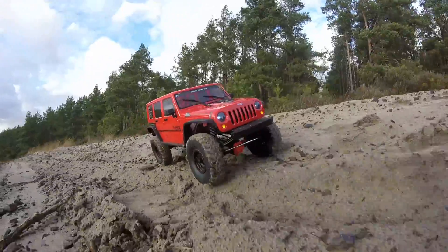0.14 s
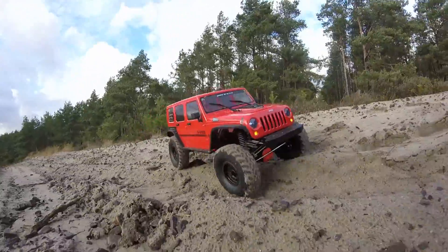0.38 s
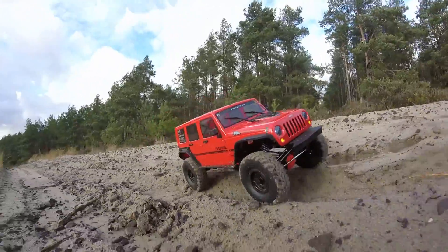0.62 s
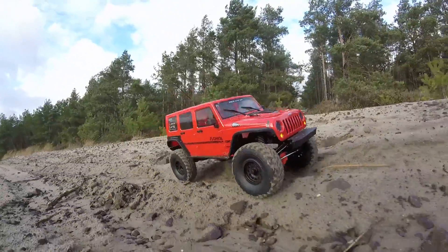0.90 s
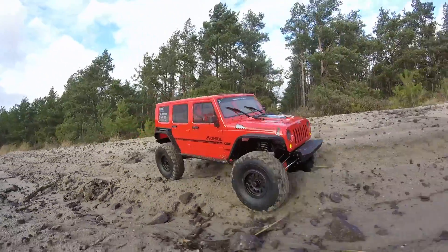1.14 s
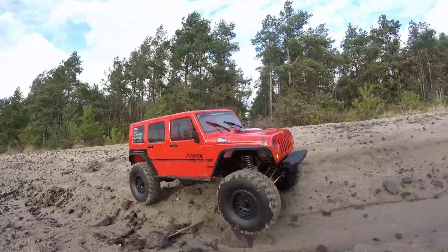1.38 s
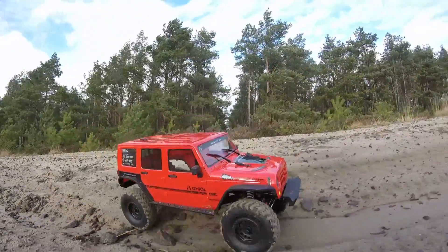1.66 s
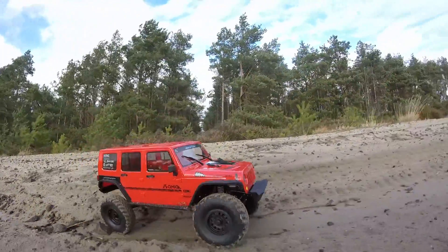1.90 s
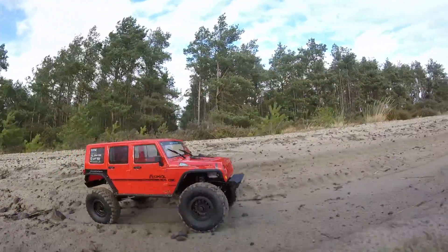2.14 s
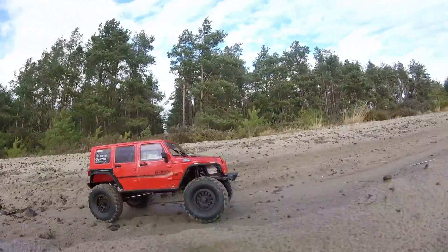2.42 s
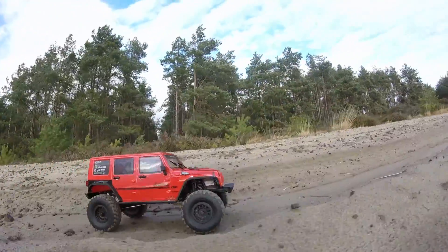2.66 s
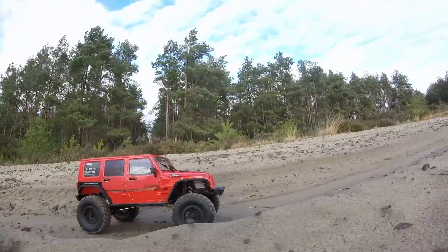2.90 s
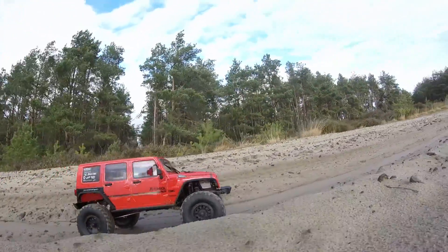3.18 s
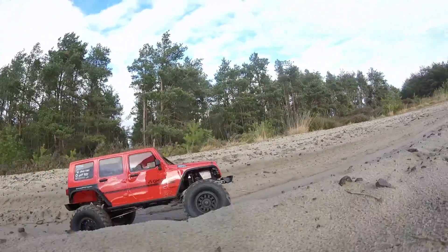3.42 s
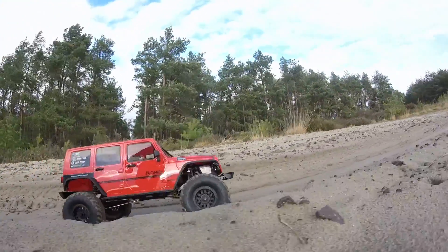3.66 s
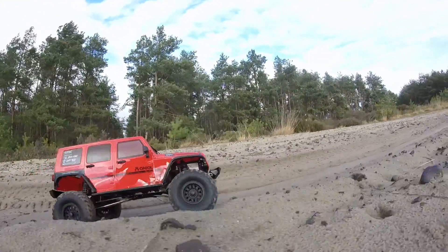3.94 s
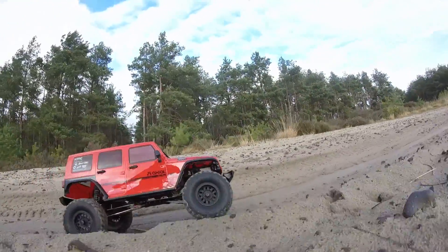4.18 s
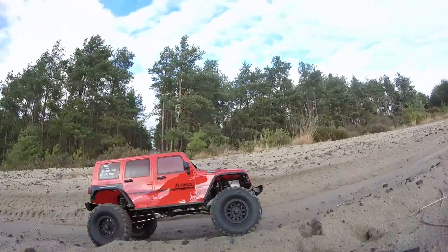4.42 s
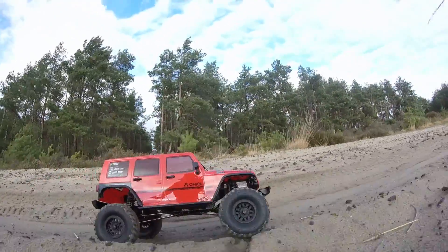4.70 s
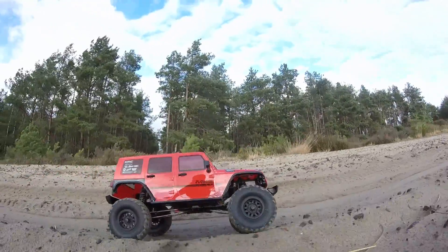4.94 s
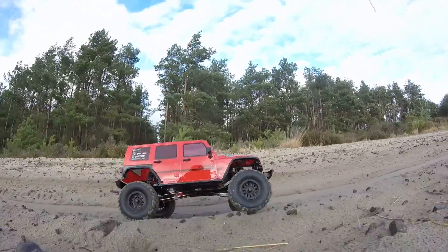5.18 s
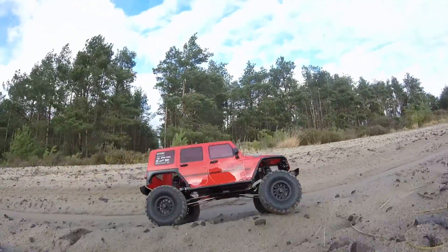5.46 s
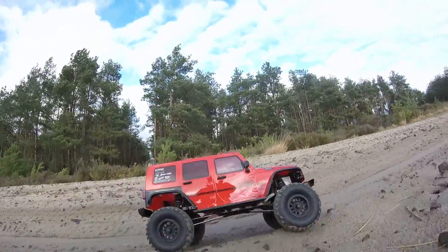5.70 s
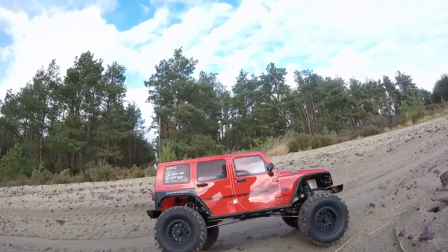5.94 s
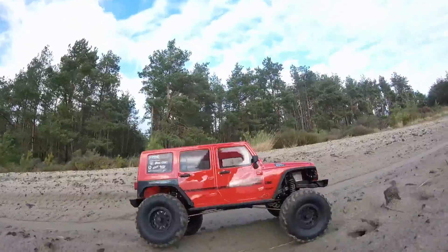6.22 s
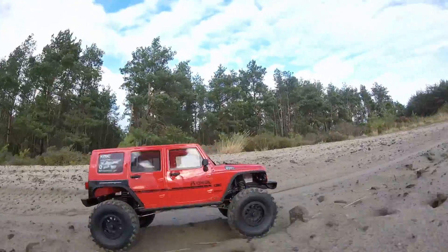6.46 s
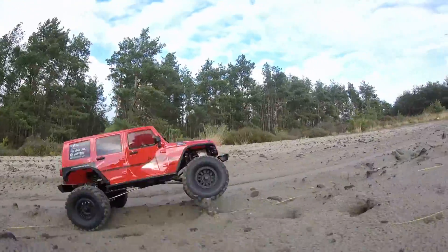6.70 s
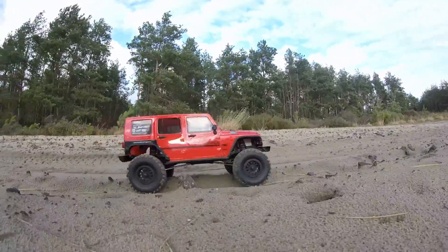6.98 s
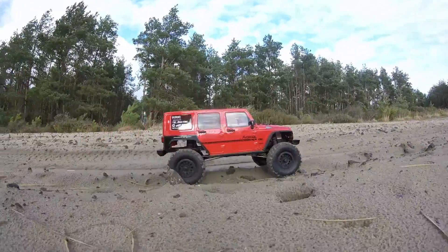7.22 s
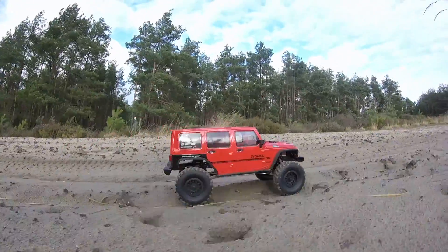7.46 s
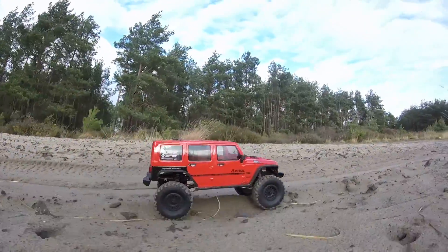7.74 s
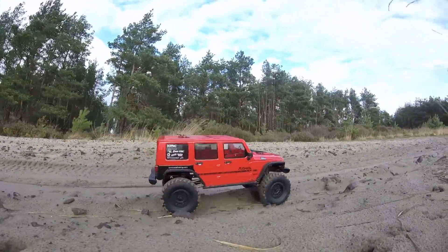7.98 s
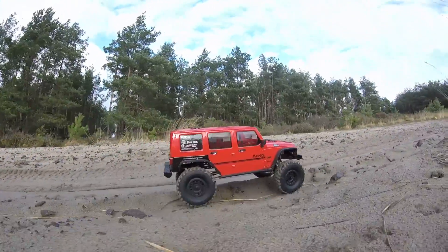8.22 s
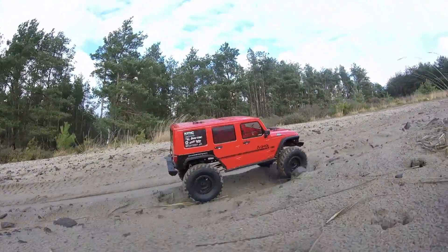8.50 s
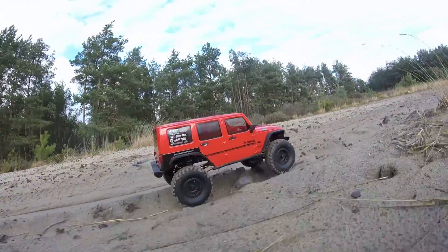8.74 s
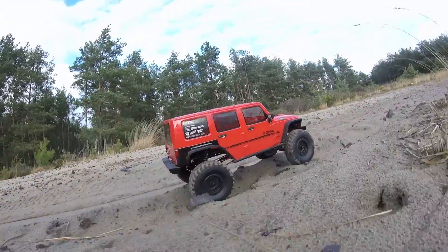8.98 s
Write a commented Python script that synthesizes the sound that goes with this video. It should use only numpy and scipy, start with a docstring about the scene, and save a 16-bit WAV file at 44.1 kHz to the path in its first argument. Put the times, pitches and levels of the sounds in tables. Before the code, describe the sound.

A quiet open-air bed with a tiny motor's thin, rough whirr, distant and unsteady. Light clicks of plastic come first, then a few dry grit ticks underfoot. Suddenly the camera's plastic case cracks and creaks hard right at the microphone, with a nasal groan and shaking rumble from the handle. After a short lull, scattered creaks return, and a final dense burst of snaps closes it.

```python
"""Open sandy ground: a small electric truck crawls along, followed by a hand-held camera in a plastic housing.
Gear teeth in mesh whine faintly and ring the truck's shell. Impulsive slips and stick-slip rubbing excite
the housing's resonances as snaps and creaks. The handle murmurs, then groans as a narrow-band tone, and
rumbles and thumps; grit ticks underfoot with short decaying knocks, and shaped noise makes a quiet
open-air hiss under all."""
import sys
import numpy as np
from scipy import signal
from scipy.fft import rfft, irfft, next_fast_len
from scipy.io import wavfile
from scipy.ndimage import uniform_filter1d, map_coordinates

SR = 44100
rng = np.random.default_rng(int(sys.argv[2]) if len(sys.argv) > 2 else 0)


def gain_from_decibels(decibels):
    """Convert decibel values to linear amplitude factors."""
    exponent = np.asarray(decibels, float) / 20
    return 10 ** exponent


def wav_out(sig):
    """Save sig, one row per channel (or a flat mono array), as 16-bit PCM at SR to the path in sys.argv[1]."""
    wavfile.write(sys.argv[1], SR, np.round(np.clip(np.atleast_2d(sig).T, -1, 1) * 32767).astype(np.int16))


N = 402191  # length in samples

# resonances of the plastic housing: (centre [Hz], width [Hz], relative level [dB])
HOUSING_MODES = [(988, 16, -24), (1072.5, 35, -6), (1266, 87, 1.5), (1477, 52, -0.5), (1746, 150, -1),
                 (2019, 90, -2.5), (2471, 83, 11.5), (3160, 72, 3), (3470, 52, 2.5), (3710, 253, -2),
                 (3941, 41, 0), (4088, 116, -7), (4590, 125, -11), (5350, 62, -28), (6320, 75, -21.5),
                 (6760, 134, -22.5), (7300, 610, -31), (8260, 51, -31.5), (9475, 37, -14),
                 (9650, 790, -23.5), (10520, 60, -25), (13000, 320, -42), (13930, 400, -48)]
# snaps of the housing: (time [s], peak level [dB], brightness of the high modes [dB])
SNAP_EVENTS = [(2.9419, -26, 3), (2.967, -25.5, -20), (3.018, -24, -28), (3.076, -37.5, -13),
               (3.101, -27, 2), (3.169, -39, -15), (3.199, -29.5, 4), (3.3632, -23, -22), (3.3722, -31, -2),
               (3.38, -34.5, 0), (3.436, -28, -22), (3.4585, -36, -10), (3.5716, -32.5, -8),
               (3.9044, -32, 3), (3.9144, -37, -7), (4.893, -24, 0), (4.908, -32, 5), (5.0327, -4.5, -3),
               (5.1028, -8, -1), (5.1752, -14.5, 2), (5.198, -6.5, 7), (5.249, -14, -1), (5.29, -14.5, 4),
               (5.303, -15, 4), (5.3271, -24, -10), (5.344, -33, -12), (5.3654, -21, -6), (5.3822, -28, 5),
               (5.4, -22, -8), (5.478, -20.5, -16), (5.583, -7.5, 1.5), (5.685, -14.5, 4),
               (5.698, -12.5, -5), (5.7128, -12, 6), (5.741, -34, -8), (5.8323, -22.5, 7),
               (5.877, -16.5, -16), (5.9469, -26, -10), (6.0021, -20, -15), (6.206, -18.5, 0),
               (6.2131, -15.5, -4), (6.2538, -25, -5), (6.2956, -28, -8), (6.3068, -22, -14),
               (6.3262, -25, 6), (6.3874, -27.5, 9), (6.513, -17, -15), (6.5386, -27.5, -8),
               (6.653, -25, 8), (6.771, -12.5, 8), (6.79, -16.5, 0), (6.8278, -26, -8), (7.4103, -32, 5),
               (7.502, -18.5, 1), (7.5606, -24.5, 0), (7.5805, -17.5, 0), (7.635, -13, 4.5),
               (7.6602, -21, 6), (7.7333, -12.5, 3), (7.7545, -16, 7), (7.7714, -16, 3), (7.8388, -23, 6),
               (7.858, -24.5, 7), (7.9232, -17.5, 4), (7.9543, -24.5, -15), (8.016, -20, 5),
               (8.115, -26.5, -8), (8.1847, -29.5, 4), (8.2856, -25.5, 1), (8.304, -21, 2),
               (8.3609, -30, 2), (8.3903, -28, -1), (8.4846, -35, 8), (8.582, -30.5, -2),
               (8.6806, -21.5, -1.5), (8.7078, -21, -20), (8.733, -24, -3), (8.742, -7.5, -1),
               (8.8026, -11.5, 6), (8.8102, -18, 9), (8.863, -7, 2), (8.874, -8, -10), (8.8971, -15, -2),
               (8.906, -12, 8), (8.936, -20, -5), (8.9615, -20, -6), (9.0074, -17, -10),
               (9.0306, -16.5, -16.5), (9.068, -17, 2), (9.097, -20, 5), (9.1075, -17, -2)]
# how freely the grip lets the housing sound: (time [s], main ring [dB], high modes under rubbing [dB])
GRIP_FREEDOM = [(3.5, -1, -7), (5, 1.5, -1.5), (5.8, 1, 1), (6.1, -2.5, 3.5), (7.2, -1.5, -1.5), (9, -2, 1)]
# strokes of the hand along the grip: (time of full level [s], time held [s], driving level [dB])
GRIP_STROKES = [(3.321, 0.032, -54), (3.451, 0.07, -52), (3.6, 0.16, -49), (5.131, 0.012, -36),
                (5.209, 0.18, -34), (5.442, 0.31, -37), (5.709, 0.03, -31.5), (5.78, 0.21, -34.5),
                (6.032, 0.17, -34.5), (6.215, 0.011, -30), (6.268, 0.029, -27), (6.333, 0.2, -32.5),
                (6.647, 0.033, -35), (6.76, 0.11, -41), (6.9, 0.48, -49), (7.391, 0.032, -39),
                (7.568, 0.15, -41), (7.77, 0.15, -40), (7.938, 0.077, -36.5), (8.05, 0.29, -40.5),
                (8.379, 0.11, -39.5), (8.5, 0.047, -46), (8.711, 0.14, -44.5), (8.856, 0.025, -29.5),
                (8.921, 0.21, -32.5)]
# a tightening squeeze that pulls the high modes flat: (time [s], squeeze [0-1])
GRIP_SQUEEZE = [(8.3, 0), (8.42, .9), (8.66, 1), (8.7, 0)]
# low narrow-band sound of the handle, a faint unsteady murmur until 4.2 s, then a groan:
# (time [s], pitch [Hz], level [dB])
HANDLE_TRACK = [(0, 64, -72), (.66, 68.4, -54), (1.3, 69.5, -55), (2.4, 65.8, -67), (3.6, 75.5, -68),
                (4.1, 75.3, -63), (4.29, 105, -49.5), (4.62, 93.6, -47.5), (4.85, 114.4, -40),
                (4.98, 145, -36.5), (5.1, 143.8, -43), (5.24, 99.7, -43.5), (5.33, 140.7, -35),
                (5.4, 139, -39.5), (5.5, 120.7, -32.5), (5.66, 141, -36), (5.88, 124.3, -56),
                (5.95, 125.4, -28), (6.03, 118.3, -40.5), (6.14, 122, -32.5), (6.2, 129.4, -24),
                (6.39, 173.3, -21.5), (6.53, 135.8, -29), (6.76, 140, -28.5), (6.83, 104.2, -33),
                (6.9, 100.4, -48), (7.07, 85.5, -47), (7.19, 98.1, -41.5), (7.28, 129.8, -42.5),
                (7.35, 134.6, -40), (7.5, 98, -44.5), (7.9, 105.3, -46), (8.2, 119, -55.5),
                (8.6, 110.2, -46.5), (9.12, 141, -71)]
# shaking carried by hand and handle, stronger once the walker hurries: (time [s], rumble level [dB])
HAND_SHAKING = [(0, -47.5), (2.6, -48.5), (3.2, -54.5), (4.3, -46.5), (5.3, -39.5), (6.7, -40.5),
                (7.7, -48.5), (8.2, -41.5), (9.12, -45)]
# spectrum of the rumble: (frequency [Hz], relative density [dB])
RUMBLE_SPECTRUM = [(12, -25), (22, -6.5), (33, -1.5), (43, 4.5), (54, -6), (70, -6.5), (110, -60.5)]
# spectrum of the handle's shudder: (frequency [Hz], relative density [dB])
SHUDDER_SPECTRUM = [(100, -4), (170, -5.5), (210, -9.5), (361, -1.5), (380, -7), (449, -18), (566, -23),
                    (622, -19), (700, -29), (910, -111)]
# dull thumps in the handle: (time [s], level before onset and decay [dB], pitch [Hz])
HANDLE_THUMPS = [(3.37, -37, 359), (3.873, -34.5, 295), (5.032, -26.5, 350), (5.107, -27.5, 324),
                 (5.582, -26.5, 318), (6.263, -19, 328), (8.301, -24.5, 352.3), (8.421, -27.5, 310),
                 (8.501, -30.5, 320), (8.741, -28, 330)]
# grit underfoot: (time [s], tick level before halving [dB], starting level of the knock [dB])
GRIT_EVENTS = [(4.241, -35, -38), (4.2772, -28, -31), (4.2811, -26.5, -31), (4.33, -40, -37),
               (4.436, -39, -37.5), (4.4612, -38.5, -42), (4.7269, -29.5, -30), (5.002, -21, -24),
               (6.5807, -25.5, -43)]
# spectrum of a grit tick: (frequency [Hz], relative density [dB])
GRIT_SPECTRUM = [(900, -42), (2000, 5), (4000, 3.5), (7000, 2), (10000, -3), (13000, -18), (15500, -26)]
# the truck's drive: (time [s], gear-mesh frequency [Hz], load as level of the whine [dB])
DRIVE_TRACK = [(0, 954, -92), (.35, 1024, -89), (.52, 965, -66), (.63, 1025, -68), (.79, 1050, -50.5),
               (.87, 1075, -65), (.94, 1063, -55), (1.02, 1094, -59), (1.3, 1160, -71), (1.45, 1035, -58.5),
               (1.58, 1106, -57), (1.72, 1086, -50), (1.79, 1080, -59.5), (1.97, 1068, -60.5),
               (2.05, 1073, -72), (2.11, 1102, -54), (2.18, 1105, -79), (2.3, 1096, -67), (2.42, 1099, -71),
               (2.57, 1077, -57.5), (2.75, 1094, -66), (3.1, 1083, -60), (3.72, 1030, -59),
               (3.85, 1075, -67), (4.15, 1034, -61), (4.45, 1070, -61), (4.66, 1049, -57),
               (4.85, 1082, -64), (7, 1042, -60)]
# mesh tone an octave under the whine, clearest while the gearbox side faces the camera: (time [s], level [dB])
MESH_LEVEL = [(.25, -77), (.45, -63), (.8, -62), (.93, -84), (1.05, -73), (1.4, -63), (1.8, -66.5),
              (3, -71), (4.2, -71), (4.6, -64.5), (7, -66.5)]
# resonances of the truck's shell: (centre [Hz], width [Hz], relative level [dB])
SHELL_MODES = [(2526, 110, 8), (3160, 230, 2), (3445, 140, 5.5), (4120, 240, 5), (4860, 170, -1),
               (5000, 74, -11)]
# short smeared tones of the truck at fixed pitches: (middle [s], length [s], pitch [Hz], level [dB])
TONE_FLARES = [(.5, 0.07, 3470, -62), (1.031, .06, 4260, -61), (1.28, 0.28, 3480, -62.5),
               (1.453, 0.13, 3120, -57.5), (1.449, .14, 4240, -62), (1.853, 0.16, 4150, -61),
               (4.101, .3, 4176, -65), (4.72, .35, 5200, -67), (1.08, .35, 2560, -65)]
# spectrum of the open air: (frequency [Hz], relative density [dB])
AIR_SPECTRUM = [(41, -52), (70, -5.5), (108, -2.5), (548, -14), (1820, -19), (2180, -16.5), (2850, -47),
                (3830, -39), (4190, -60), (5500, -28), (9250, -36), (14500, -59), (15600, -55)]

# groups of housing modes
CENTRES = np.transpose(HOUSING_MODES)[0]
LOW, HIGH = CENTRES < 1900, CENTRES > 5000
MAIN = np.abs(CENTRES - 2450) < 150
UPPER = (CENTRES > 2900) & ~HIGH

LOW_RING_DB, UPPER_RING_DB = -6, -3  # a snap drives these modes less than rubbing does
HIGH_SAG, MAIN_SAG = .065, .035  # fractional drop in pitch of a fully damped mode
GRIP_S, LET_GO_DB_PER_S = 0.081, 242  # swell before a stroke's full level, fall after its hold
RESTING_DB = -70.5  # the hand resting on the grip
BRIGHT_DB, BRIGHT_PER_DB = 3.5, -0.33  # extra brightness at -32 dB, its change per dB of rubbing
SLIDE_DB, SLIDES_PER_S = 2, 10  # the fingers wander, so each mode is driven now harder, now softer
LOOSE_DB, LOOSE_PER_S, WANDER = 1.5, 12, .07  # when faint, the handle's tone is lumpy and wanders in pitch
GROAN_SMEAR_HZ = 70
LUMPS_DB, LUMPS_PER_S = 3.5, 4.023  # unevenness of the rumble
KNOCK_HZ, KNOCK_S, TICK_S = 2170, 0.0024, 0.0011  # the knock's ring, decay times of knock and tick
MESH_CLEAN, WHINE_CLEAN = .5, .55  # clean share of each gear tone
THROB = .7  # depth of the whine's throbbing
AIR_DB = -55.5


def unit(x):
    """Normalisation: the signal scaled to rms 1."""
    return x / np.sqrt(np.mean(x ** 2) + 1e-20)


def curves(rows):
    """Linear interpolation: one value per sample for each column after the time."""
    s, *cols = np.transpose(rows)
    return [np.interp(np.arange(N) / SR, s, c) for c in cols]


def wobble(rate):
    """Band-limited fluctuation: a smooth random curve with rate knots a second."""
    knots = rng.standard_normal(int(N * rate / SR) + 4)
    return map_coordinates(knots, [np.arange(N) * rate / SR])


def narrow(turn, hz, clean):
    """Narrow-band modulation: a clean share of a tone, the rest smeared over about hz; rms near 1."""
    smear = wobble(hz) * np.sin(turn) + wobble(hz) * np.cos(turn)
    return np.sqrt(2 * clean) * np.sin(turn) + np.sqrt(1 - clean) * smear


def filtered(x, response):
    """Linear filtering: the spectrum times a response of frequency."""
    m = next_fast_len(N + 8192)
    return irfft(rfft(x, m) * response(np.fft.rfftfreq(m, 1 / SR)), m)[:N]


def coloured(x, spectrum):
    """Spectral shaping: interpolation in dB over log frequency, scaled to rms 1."""
    f, db = np.transpose(spectrum)
    return unit(filtered(x, lambda hz: gain_from_decibels(np.interp(np.log(hz + 1), np.log(f + 1), db))))


def modes(hz, table=HOUSING_MODES):
    """Modal resonance: one response per row; neighbours move in opposite sense; the top is damped."""
    centre, width, db = np.transpose(table)[:, :, None]
    sign = (-1.) ** np.arange(len(centre))[:, None]
    resonance = 1j * hz * width / (centre * centre - hz * hz + 1j * hz * width)
    u = hz / 11200
    return sign * gain_from_decibels(db) * resonance / (1 - u * u + 1.2j * u) ** 3


def damped(fingers, squeeze=0):
    """Loading of a resonator: the main ring and the top modes of the housing pulled flat."""
    sag = fingers * MAIN_SAG * MAIN + squeeze * HIGH_SAG * (CENTRES > 7500)
    return HOUSING_MODES * np.c_[1 - sag, np.ones((len(sag), 2))]


def snaps():
    """Impulsive excitation: each short ragged slip rings the housing's modes at new strengths."""
    size = 4096
    s, db, high_db = np.transpose(SNAP_EVENTS)[:, :, None]
    t = np.arange(size) / SR
    slip = rng.standard_normal((len(s), size))
    slip *= np.exp(-(t / 0.0016) ** 2) + 0.18 * np.exp(-t / 0.01)
    slip *= 1 - np.exp(-(t + 1 / SR) / 0.00027)  # the release takes a moment
    main_db = np.interp(s, *np.transpose(GRIP_FREEDOM)[:2])
    strength_db = LOW * LOW_RING_DB + UPPER * UPPER_RING_DB + MAIN * main_db + HIGH * high_db
    # every mode but the main ring varies from snap to snap
    strength_db = strength_db + 2 * ~MAIN * rng.standard_normal((len(s), len(HOUSING_MODES)))
    response = modes(np.fft.rfftfreq(size, 1 / SR), damped(0.4))  # the grip is half closed
    ring = irfft(rfft(slip) * (gain_from_decibels(strength_db) @ response), size)
    ring *= gain_from_decibels(db) / np.abs(ring).max(1, keepdims=True)
    at = np.round(s * SR).astype(int) + np.arange(size)
    return np.bincount(at.ravel(), ring.ravel(), N + size)[:N]


def strokes():
    """Friction envelope in dB: every stroke swells in, holds and dies away; strokes add in power."""
    s, held, db = np.transpose(GRIP_STROKES)[:, :, None]
    t = np.arange(0, N, 32) / SR
    swell = np.clip((t - s) / GRIP_S + 1, 0, 1) ** 2
    shape = swell * gain_from_decibels(db - LET_GO_DB_PER_S * np.maximum(t - s - held, 0))
    total = np.sqrt((shape ** 2).sum(0) + gain_from_decibels(RESTING_DB) ** 2)
    return np.interp(np.arange(N) / SR, t, 20 * np.log10(total))


def rub():
    """Stick-slip friction: dense tiny slips of unequal size on a thin scrape drive the housing's modes."""
    db = strokes()
    free_db, open_db = curves(GRIP_FREEDOM)
    high_db = open_db + BRIGHT_DB + BRIGHT_PER_DB * (db + 32.0) + 1.0 * wobble(7.6)
    chance, size = rng.random(N), rng.exponential(size=N)
    scrape = rng.standard_normal((2, N))
    slips = (chance < 300 / SR) * gain_from_decibels(4.5 * np.minimum(size, 2))  # about 300 a second
    lasting = signal.lfilter([1], [1, -np.exp(-1 / (0.0007 * SR))], slips)  # each slip lasts a moment
    force = unit(unit(lasting * scrape[0]) + .75 * scrape[1])
    force *= gain_from_decibels(1.3 * wobble(60) + .8 * wobble(22))

    m = next_fast_len(N + 8192)
    hz = np.fft.rfftfreq(m, 1 / SR)
    response = modes(hz)
    flat = modes(hz, damped(0.98, 0.95))
    squeeze, = curves(GRIP_SQUEEZE)
    fingers = (1 + np.tanh(wobble(7))) / 2  # the main ring drifts with the fingers
    scale = np.sqrt(np.mean(np.abs(response.sum(0)) ** 2))
    ring = 0
    for free, pressed, high, main in zip(response, flat, HIGH, MAIN):
        push = force * gain_from_decibels(db + high * high_db + main * free_db + SLIDE_DB * wobble(SLIDES_PER_S))
        share = high * squeeze + main * fingers  # power share of the flattened mode
        ring = ring + free * rfft(push * np.sqrt(1 - share), m)
        ring = ring + pressed * rfft(push * np.sqrt(share), m)
    return irfft(ring, m)[:N] / scale


def thumps():
    """Damped oscillation: each thump is a sine with a soft onset, falling 60 dB in 0.05 s."""
    t = np.arange(N) / SR
    total = 0
    for s, db, hz in HANDLE_THUMPS:
        age = np.maximum(t - s, 0)
        onset = 1 - np.exp(-age / 0.0011)
        total = total + gain_from_decibels(db - 60 * age / 0.05) * np.sin(2 * np.pi * hz * age) * onset
    return total


def handle():
    """Narrow-band vibration: a murmur, then a groan, on its own pitch and level track, clearer when louder.

    Low shaking and thumps, as shaped noise and damped sines, join it."""
    hz, db = curves(HANDLE_TRACK)
    clean = np.clip((db + 38) / 20, .05, .65)
    loose = 1 - clean
    hz = hz * (1 + WANDER * loose * wobble(LOOSE_PER_S))
    lumps_db = 2.9 * wobble(25) + LOOSE_DB * loose * wobble(LOOSE_PER_S)
    tone = gain_from_decibels(db + lumps_db) * narrow(2 * np.pi * np.cumsum(hz) / SR, GROAN_SMEAR_HZ, clean)

    rumble_db, = curves(HAND_SHAKING)
    rumble_gain = gain_from_decibels(rumble_db + LUMPS_DB * wobble(LUMPS_PER_S))
    rumble = rumble_gain * coloured(rng.standard_normal(N), RUMBLE_SPECTRUM)

    # the shudder grows with both the rubbing and the handle's tone
    rubbing_db = uniform_filter1d(strokes(), size=5000)
    shaking = np.hypot(gain_from_decibels(-20.5 + 0.68 * rubbing_db), gain_from_decibels(-18.0 + 0.84 * db))
    shudder = shaking * gain_from_decibels(2.4 * wobble(14)) * coloured(rng.standard_normal(N), SHUDDER_SPECTRUM)
    return tone + rumble + shudder + thumps()


def grit():
    """Impact radiation: dry bright ticks through the air, each with a short woody damped knock."""
    s, db, knock_db = np.transpose(GRIT_EVENTS)
    at = np.round(s * SR).astype(int)
    envelope = signal.lfilter([1], [1, -np.exp(-1 / (TICK_S * SR))], np.bincount(at, gain_from_decibels(db), N))
    ticks = envelope * coloured(rng.standard_normal(N), GRIT_SPECTRUM) / 2
    t = np.arange(1500) / SR
    knock = np.exp(-t / KNOCK_S) * np.sin(2 * np.pi * KNOCK_HZ * t)
    knocks = signal.fftconvolve(np.bincount(at, gain_from_decibels(knock_db), N), knock)[:N]
    return ticks + knocks


def drive():
    """Gear-mesh excitation: rough tones, throbbing twice per shaft turn; noise and overtones ring the shell."""
    mesh, load_db = curves(DRIVE_TRACK)
    turn = 2 * np.pi * np.cumsum(mesh * (1 + 0.008 * wobble(22) + 0.008 * wobble(9))) / SR
    shaft = turn / 18  # teeth on the pinion
    # throbbing splits the whine into strands
    throb = 1 + THROB * wobble(14) * np.sin(2 * shaft + 1.5 * wobble(18))
    mesh_gain = gain_from_decibels(curves(MESH_LEVEL)[0] + wobble(25) + 2.5 * wobble(11))
    mesh_tone = mesh_gain * narrow(turn, 50, clean=MESH_CLEAN)
    whine_gain = gain_from_decibels(load_db + wobble(6) + 1.8 * wobble(22)) * throb
    whine = whine_gain * narrow(2 * turn, 85, clean=WHINE_CLEAN)

    # an overtone stands out only while it passes a shell mode
    overtones = sum(gain_from_decibels(3 * wobble(12)) * narrow(k * turn, 110, clean=.3) for k in range(3, 6))
    sung = filtered(overtones, lambda hz: modes(hz, SHELL_MODES).sum(0))
    sung_gain = gain_from_decibels(-71.0 + 0.99 * (load_db + 54.5))

    # each shell mode's noise swells and fades at random, on its own
    whirr = 0
    for mode in SHELL_MODES:
        noise = rng.standard_normal(N) * gain_from_decibels(2.2 * wobble(9))
        whirr = whirr + filtered(noise, lambda hz: modes(hz, [mode])[0])
    return mesh_tone + whine + sung_gain * sung + gain_from_decibels(-62.5) * unit(whirr)


def flares():
    """Gaussian envelope: short smeared tones of the truck at fixed pitches swell and fade."""
    t = np.arange(N) / SR
    total = 0
    for s, length, hz, db in TONE_FLARES:
        swell = gain_from_decibels(db - 9 * ((t - s) * 2 / length) ** 2)  # 9 dB down at either end of the length
        total = total + swell * narrow(2 * np.pi * hz * t, 260, clean=0)
    return total


def air():
    """Broadband noise: far trees and the microphone's own hiss, with a slowly drifting level."""
    return gain_from_decibels(AIR_DB + 0.95 * wobble(2.135)) * coloured(rng.standard_normal(N), AIR_SPECTRUM)


def scene():
    """Superposition: all sources add at one microphone."""
    return (snaps() + rub() + handle() + grit() + drive() + flares() + air())[None]


def roll_off(x):
    """The treble ends steeply here."""
    return signal.sosfilt(signal.butter(12, 15710, fs=SR, output="sos"), x)


def record(dry):
    """Band limiting: a lowpass whose top fades linearly to nothing from 14.7 to 15.7 kHz."""
    limited = filtered(dry[0], lambda hz: np.clip((15700 - hz) / 1000, 0, 1))
    return roll_off(limited[None])


dry = scene()
out = record(dry)
wav_out(out)
```